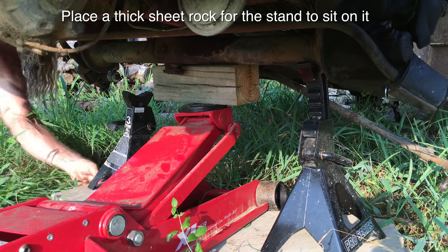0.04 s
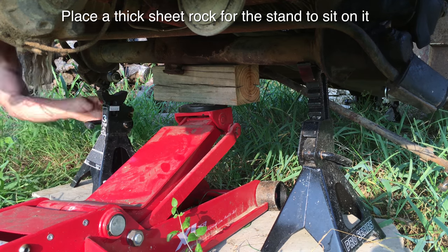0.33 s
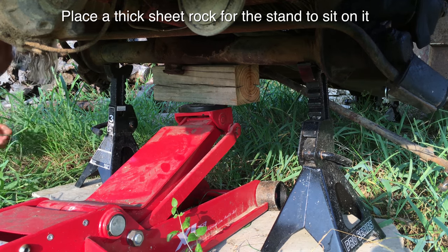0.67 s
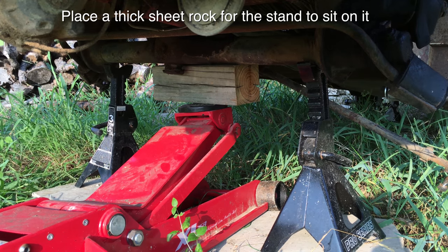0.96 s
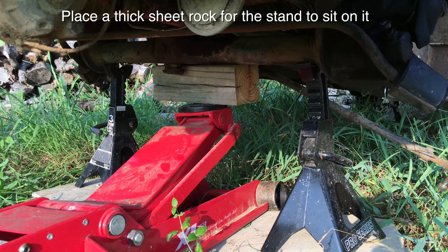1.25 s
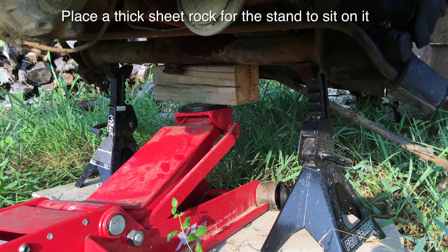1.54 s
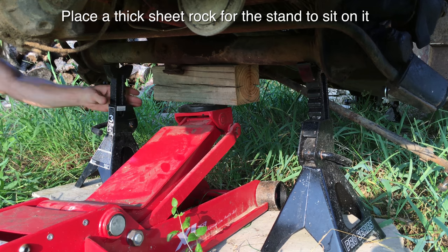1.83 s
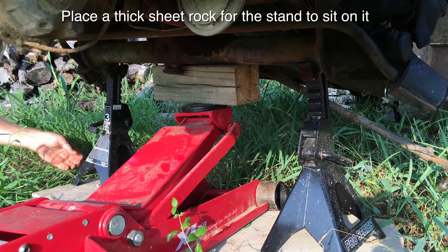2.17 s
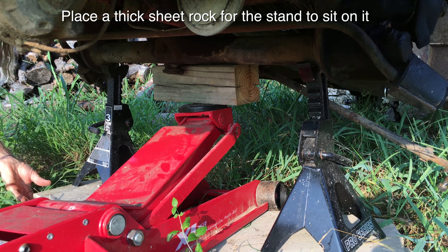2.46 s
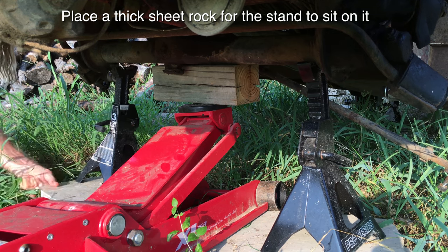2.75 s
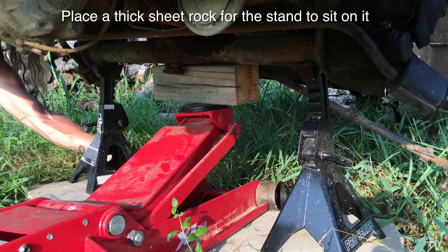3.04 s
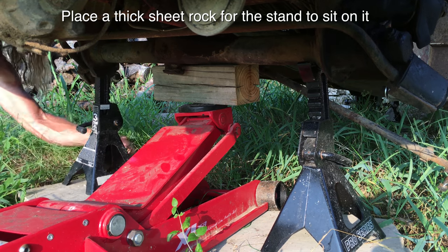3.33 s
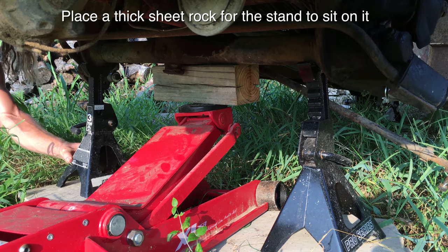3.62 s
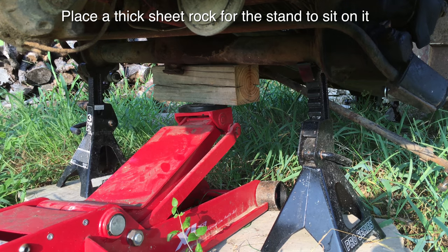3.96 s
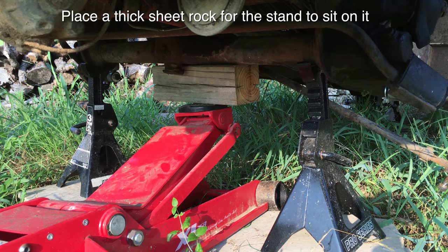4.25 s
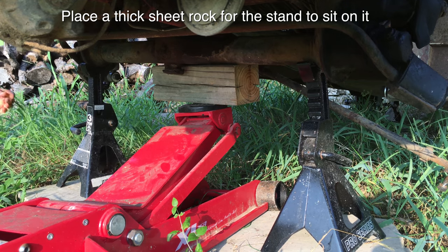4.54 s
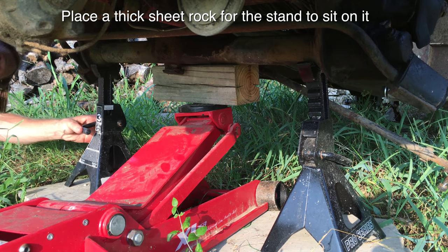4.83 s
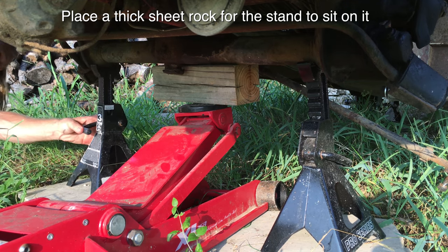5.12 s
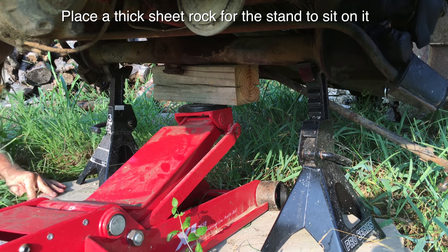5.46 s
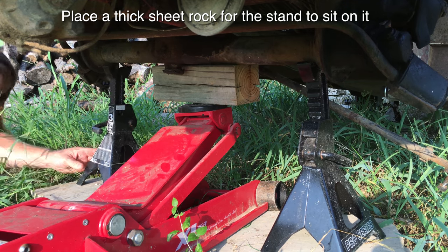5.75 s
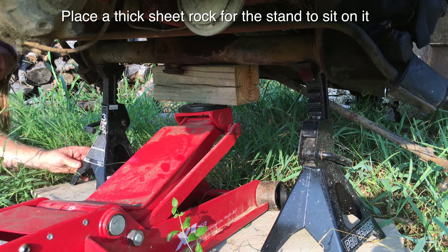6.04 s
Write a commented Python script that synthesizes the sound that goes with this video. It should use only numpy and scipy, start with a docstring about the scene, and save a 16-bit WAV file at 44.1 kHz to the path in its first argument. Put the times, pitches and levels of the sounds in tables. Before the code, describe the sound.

Close by, a steel jack stand clanks a few times and its toothed bar is pulled up with a short, ringing rattle. In the lull, small birds call faintly far off and a low drone swells. Then the legs are shuffled and knocked on a stone slab, with dull thuds in the soil, and a few light clanks finish. Grass rustles softly over a quiet outdoor rumble and thin hiss.

```python
"""A steel jack stand is set under a truck, outdoors in grass, over a low rumble and a thin high hiss.
First its toothed bar is pulled up with a rattle that rings the sheet-steel frame. In the lull after
it, small birds call far off and a low drone swells. Then the legs are shuffled and knocked on a stone
slab, which thuds on the soil, and a few light clanks end the move.
Grass rustles throughout as the stand is handled."""
import sys
import numpy as np
from scipy import signal
from scipy.fft import rfft, irfft, next_fast_len
from scipy.io import wavfile
from scipy.ndimage import map_coordinates

SR = 44100
rng = np.random.default_rng(int(sys.argv[2]) if len(sys.argv) > 2 else 0)


def file_out(sig):
    """Save sig as 16-bit WAV at sys.argv[1]."""
    # one column per channel
    cols = np.atleast_2d(sig).T
    # limit, then scale
    lim = np.clip(cols, -1, 1)
    pcm = np.round(lim * 32767).astype(np.int16)
    wavfile.write(sys.argv[1], SR, pcm)


N = 268480


def amp(db):
    """Decibels to gain."""
    return 10 ** (np.asarray(db) / 20)


def unit(x):
    """x at rms 1."""
    return x / np.sqrt(np.mean(x ** 2) + 1e-20)


def colour(points, hz):
    """Gain of an EQ curve: (Hz, dB) points joined on a log axis."""
    point_hz, db = np.transpose(points)
    return amp(np.interp(np.log(hz + 1), np.log(point_hz + 1), db))


def wobble(rate):
    """A smooth random curve, rate knots a second."""
    knots = rng.standard_normal(int(N * rate / SR) + 4)
    steps = np.linspace(0, len(knots) - 1, 10 * len(knots))
    return np.interp(np.arange(N) * rate / SR, steps, map_coordinates(knots, [steps]))


def filtered(x, gain):
    """x through a gain that is a function of frequency."""
    size = next_fast_len(N + SR // 2)
    return irfft(rfft(x, size) * gain(np.fft.rfftfreq(size, 1 / SR)), size)[:N]


def noise(eq, grain_db=0):
    """Coloured noise of rms 1; grain breaks it into tiny crackles."""
    source = rng.standard_normal(N) * amp(grain_db * wobble(600))
    return unit(filtered(source, lambda hz: colour(eq, hz)))


def swell_at(s, half, edge=2):
    """A smooth rise and fall around time s; a higher edge gives it a flatter top."""
    distance = np.abs((np.arange(N) / SR - s) / half)
    return np.exp(-.5 * np.minimum(distance, 10) ** edge)


def add(track, sound, s):
    """Mix a sound into the track, centred on time s."""
    start = round(s * SR) - len(sound) // 2
    sound = sound[max(-start, 0):max(N - start, 0)]
    track[max(start, 0):][:len(sound)] += sound


# The drone's fader ride. Each row: time in seconds, relative level in dB.
DRONE_RIDE = [(0.0, -79), (1.05, -66.5), (1.24, -63), (1.54, -63), (1.91, -67.5), (3.56, -68.5),
              (4.09, -69), (6.09, -74.5)]
# Tone of the low and the high bed. Each row: frequency in Hz, gain in dB.
RUMBLE_EQ = [(12, -50), (20, -23.5), (47, -2.5), (87, -4.5), (145, -7), (163, -8.5), (180, -12.5),
             (232, -15.5), (312, -17.5), (500, -38.5), (650, -66), (1100, -120)]
HISS_EQ = [(6000, -30.5), (8400, -24), (9000, -4), (9600, -2.5), (10150, 2.5), (10500, -7.5), (11000, -10),
           (12500, -22), (15600, -38)]


def air(drone_hz=146, width_hz=11):
    """The outdoor bed: rumble, a distant drone of narrow, wavering noise and a thin high hiss."""
    ride_db = np.interp(np.arange(N) / SR, *np.transpose(DRONE_RIDE))
    drone = filtered(rng.standard_normal(N), lambda hz: 1 / (1 + ((hz - drone_hz) / width_hz) ** 2))
    return amp(-64.5) * noise(RUMBLE_EQ) + amp(ride_db + 1) * unit(drone) + amp(-80) * noise(HISS_EQ)


# The birds' calls by name. Each entry: length in seconds, start pitch in Hz, end pitch in Hz.
BIRD_CALLS = {"slur": (.12, 4820, 3980), "whistle": (.095, 3980, 3890), "chip": (.024, 4600, 4390),
              "rise": (.032, 3170, 3380), "fall": (.05, 3310, 3060)}
# Bird cues. Each row: start in seconds, level in dB, name of the call.
BIRD_CUES = [(.348, -89, "chip"), (1.005, -75, "slur"), (1.258, -78, "fall"), (1.445, -74, "rise"),
             (1.452, -77, "chip"), (1.477, -68.5, "whistle"), (1.619, -77, "fall"), (1.786, -79, "chip"),
             (1.884, -76, "fall"), (2.264, -77, "rise"), (2.352, -75, "chip"), (3.845, -86, "slur")]


def birds(waver=0.012, echo_db=-7, echo_t60=0.25):
    """Far, gliding whistles that waver slightly, scattered by the surroundings."""
    song = np.zeros(N)
    unsteady = 1 + waver * wobble(250)
    for s, db, call in BIRD_CUES:
        length, start_hz, end_hz = BIRD_CALLS[call]
        progress = np.linspace(0, 1, int(length * SR))
        glide = start_hz + (end_hz - start_hz) * np.sin(np.pi * progress / 2) ** 2
        pitch = glide * unsteady[int(s * SR):][:len(glide)]
        envelope = np.sqrt(2 * np.abs(np.sin(np.pi * progress)))
        add(song, amp(db) * envelope * np.sin(2 * np.pi * np.cumsum(pitch) / SR), s + length / 2)
    t = np.arange(SR // 2) / SR
    tail = rng.standard_normal(len(t)) * 1000 ** (-t / echo_t60)
    return song + amp(echo_db) * signal.fftconvolve(song, tail / np.linalg.norm(tail))[:N]


# Long swishes of grass and short brushes through the blades.
# Each row: centre in seconds, half length in seconds, relative level in dB.
SWISH_CUES = [(.17, .1, -85), (.79, 0.039, -91), (1.052, 0.041, -81), (1.3, .13, -80), (1.605, 0.023, -82),
              (1.825, 0.016, -81), (2.46, 0.11, -83), (2.952, 0.099, -83.5), (3.18, 0.096, -87.5),
              (3.383, 0.059, -94), (3.804, 0.033, -89.5), (4.1, 0.084, -87), (4.293, 0.039, -79.5),
              (4.366, 0.033, -76), (5.386, 0.02, -80), (5.513, 0.032, -82.5)]
BRUSH_CUES = [(0.028, 0.0083, -64), (0.925, 0.022, -69), (1.137, 0.006, -71.5), (1.305, 0.0088, -72.5),
              (1.752, 0.014, -67), (2.075, 0.028, -66.5), (2.167, 0.0071, -67), (2.357, 0.0042, -67.5),
              (2.747, 0.0058, -58), (3.581, 0.03, -65.5), (3.754, .011, -72.5), (3.817, 0.013, -71.5),
              (4.035, 0.015, -61), (4.487, 0.0069, -63.5), (4.543, 0.0068, -62.5), (4.892, 0.015, -64),
              (4.956, .014, -67), (5.154, 0.019, -65), (5.248, 0.0062, -72), (5.424, 0.013, -68)]
# Tone of the dull shuffle, bright swish, crackling tips and brushed blades.
# Each row: frequency in Hz, gain in dB.
SHUFFLE_EQ = [(120, -22), (300, 2), (700, 2), (1600, -3.5), (3000, -9), (6000, -37)]
SWISH_EQ = [(1500, -22), (3000, -6), (6500, -3.5), (9000, -11.5), (12000, -12.5), (15500, -27.5)]
TIPS_EQ = [(5000, -12.5), (9000, -2.5), (12000, 3), (15500, -4.5)]
BLADES_EQ = [(300, 6.5), (1200, 9), (3000, 4.5), (7000, -3), (10000, -4), (15000, -11.5)]


def grass(knock_times, breeze_db=-77.5, scuff_db=-76.5, lull_db=-85):
    """Soft shuffling with each move over a stir of air, long swishes and brief brushes of the blades."""
    scuffs = sum(swell_at(s, half=0.094) for s in knock_times)
    sweeps = sum(amp(db) * swell_at(s, half, edge=3.7) for s, half, db in SWISH_CUES)
    strokes = sum(amp(db) * swell_at(s, half) for s, half, db in BRUSH_CUES)
    flutter = amp(0.51 * wobble(9.2) + 1.4 * wobble(100))  # blades catch and let go
    movement = np.sqrt(amp(breeze_db) ** 2 + (amp(scuff_db) * scuffs) ** 2 + (amp(1) * sweeps) ** 2)
    shuffle = movement * amp(0.98 * wobble(5.9)) * noise(SHUFFLE_EQ, grain_db=2)
    swish = (amp(lull_db) + sweeps) * flutter * noise(SWISH_EQ, grain_db=1.5)
    tips = amp(4) * sweeps * flutter * noise(TIPS_EQ, grain_db=1.5)
    return shuffle + swish + tips + strokes * noise(BLADES_EQ)


def struck(modes, hz, vary_db):
    """Frequency response of a body hit at a random spot: the plain blow plus its modes."""
    mode_hz, t60, mode_db = np.transpose(modes)[:, :, None]
    width = np.log(1000) / np.pi / t60
    strength = amp(mode_db + vary_db * rng.standard_normal(mode_db.shape))
    damping = 1j * hz * width
    return 1 + np.sum(strength * damping / (mode_hz ** 2 - hz ** 2 + damping), axis=0)


def hollow(eq, spot_hz, lift_db, octaves):
    """A blow's gain as a function of frequency: its EQ with a hump at the note of the spot hit."""
    def gain(hz):
        distance = np.log2((hz + 1) / spot_hz) / octaves
        return colour(eq, hz) * amp(lift_db * np.exp(-.5 * distance ** 2))
    return gain


def contact(half, db, modes, blow, grain_db, grip, held_db, vary_db, size=8192):
    """A smeared, grainy hit that swells, fades and briefly rings a body."""
    t = (np.arange(size) - size // 2) / SR
    hz = np.fft.rfftfreq(size, 1 / SR)
    swell = np.exp(-.5 * np.abs(t / half) ** 2.25)
    spectrum = rfft(swell * rng.standard_normal(size) * amp(grain_db * rng.standard_normal(size)))
    burst = irfft(spectrum / (np.abs(spectrum) + 1e-9))  # equally strong at all frequencies
    force = burst * np.sqrt(swell)
    ring = irfft(rfft(force) * struck(modes, hz, vary_db) * blow(hz))
    # the parts press together and choke the ring to a faint remainder; grip counts in half lengths
    choke = amp(held_db) + np.exp(-.5 * (np.maximum(t, 0) / (grip * half)) ** 2)
    ring = ring * choke * np.hanning(size)
    return amp(db) * ring * np.sqrt(np.sum(swell ** 2) / np.sum(ring ** 2))


# Resonances of slab and soil. Each row: pitch in Hz, t60 in seconds, level over the plain blow in dB.
SLAB_MODES = [(246, 0.054, -1), (378, .1, 7.5), (544, 0.023, 6.5), (576, 0.071, 15.5)]
SOIL_MODES = [(62, .12, -9), (94.4, 0.24, 2.5)]
# Tone of the plain blow on each. Each row: frequency in Hz, gain in dB.
SLAB_EQ = [(60, -9), (150, 6), (280, 4), (600, -12), (900, -1.5), (1400, -19), (3000, -42), (9000, -32.5),
           (16000, -55.5)]
SOIL_EQ = [(15, -25.5), (35, -3), (55, -4.5), (110, -6), (170, -12.5), (300, -21), (1000, -58)]
# Weight coming down on the slab. Each row: centre in seconds, half length in seconds,
# knock level in dB, slab note in Hz, thud level in dB, soil note in Hz.
KNOCK_CUES = [(0.545, 0.0089, -30.5, 580, -36.5, 106.8), (0.561, 0.017, -38.5, 430, -47, 100),
              (0.618, .018, -58, 250, -51, 80), (0.993, 0.023, -60, 326, -85, 110),
              (1.679, 0.019, -52.5, 345, -68, 90), (2.741, .013, -49.5, 442, -44.5, 107),
              (3.183, 0.014, -48, 585, -48, 58.6), (3.294, 0.017, -62, 323, -43, 70),
              (3.353, 0.02, -56.5, 427, -43.5, 69), (3.629, 0.0094, -44.5, 440, -49, 100),
              (3.987, 0.017, -57.5, 315, -57, 88), (4.035, 0.044, -64.5, 284, -55.5, 72.4),
              (4.501, 0.014, -54, 312, -39.5, 52.4), (4.606, 0.026, -62.5, 285, -55, 65),
              (4.67, 0.0141, -64, 436, -55, 69)]


def ground():
    """The feet knock on the slab, which then presses into the soil, each spot with its own note."""
    track = np.zeros(N)
    for s, half, knock_db, slab_hz, thud_db, soil_hz in KNOCK_CUES:
        blow = hollow(SLAB_EQ, slab_hz, lift_db=9.5, octaves=0.18)
        knock = contact(half, knock_db, SLAB_MODES, blow, grain_db=4, grip=1.3, held_db=-15, vary_db=4)
        add(track, knock, s)
        blow = hollow(SOIL_EQ, soil_hz, lift_db=12, octaves=0.59)
        thud = contact(1.5 * half, thud_db, SOIL_MODES, blow, grain_db=9, grip=3, held_db=-16, vary_db=5)
        add(track, thud, s + 0.7 * half)  # the soil gives way later and for longer
    return track


# Pure partials of the toothed bar. Each row: pitch in Hz, relative level in dB.
BAR_PARTIALS = [(413, -10), (1022, -6), (1100, -5), (1884, -6), (1949, -5), (2063, -10), (2194, 3),
                (2657, -5.5), (2697, -6.5), (2908, -6), (3127, -14.5), (3434, -3.5), (3981, -10),
                (4483, -16), (4510, -13), (4969, -18), (5782, -22), (6158, -23), (6853, -25), (9351, -28.5)]


def bar_ring(clanks, t60=0.021, vary_db=6, waver_rad=0.54):
    """The bar's partials ring on through a rattle and stop soon after it, damped by hand and socket."""
    t = np.arange(N) / SR
    drive, tones = np.zeros((2, N))
    for s, half, _, bar_db, _ in clanks:
        add(drive, amp(bar_db) * signal.windows.gaussian(SR // 5, half * SR), s)
    decay = 1000 ** (-1 / (t60 * SR))
    envelope = signal.lfilter([1 - decay], [1, -decay], drive)
    for hz, db in BAR_PARTIALS:
        shimmer = amp(db + vary_db * wobble(10))
        tones += shimmer * np.sin(2 * np.pi * (hz * t + rng.random()) + waver_rad * wobble(40))
    return envelope * unit(tones)


# Resonances of the sheet-steel frame and of the bar rattling in its socket.
# Each row: pitch in Hz, t60 in seconds, level over the plain blow in dB.
FRAME_MODES = [(440, 0.047, 10), (631, 0.051, 10.5), (686, 0.063, 8.5), (813, 0.2, 7), (963, .08, 3.5),
               (1044.5, 0.1, 16.5), (1199, .07, -1.5), (1368, 0.055, 5), (1475, 0.095, 10), (1620, 0.15, 8),
               (1958, 0.033, 9), (2390, 0.084, 9.5), (2413, 0.044, 9.5), (2530, 0.03, 2), (2596, 0.02, 1.5),
               (3330, .08, 7.5), (3860, 0.035, 10), (3990, .09, 2.5), (5520, 0.053, 5.5)]
BAR_MODES = [(660, 0.086, 4), (780, 0.1, 10.5), (1290, 0.069, 4.5), (1324, 0.029, 0.5), (1880, 0.18, 6.5),
             (2236, .08, 12), (2410, 0.078, 3), (2498, 0.07, 4), (2810, .06, 11.5), (2910, 0.13, 6),
             (3490, 0.084, 5.5), (3927, 0.038, 14), (5060, 0.15, 9.5), (5710, 0.11, 7.5), (6412, .1, 9),
             (7190, 0.19, 1), (8560, .1, 4.5)]
# Tone of the plain blow on each. Each row: frequency in Hz, gain in dB.
FRAME_EQ = [(100, -22.5), (250, -2.5), (450, -0.5), (700, 3), (1300, 3), (1900, -1.5), (2700, -7),
            (3500, -12), (5000, -20.5), (8000, -22), (11000, -31), (16000, -31.5)]
BAR_EQ = [(100, -28.5), (300, -8.5), (600, -13.5), (1400, 2.5), (2600, -4.5), (3600, -4), (5000, -8.5),
          (7000, -12), (9300, -15), (11000, -23.5), (13000, -32), (16000, -38)]
# Steel hits. Each row: centre in seconds, half length in seconds, frame level in dB,
# relative bar level in dB, note of the spot hit in Hz.
CLANK_CUES = [(0.067, 0.028, -59.5, -69, 485), (0.113, 0.0049, -55, -73, 550),
              (.136, 0.0085, -49.5, -56, 2400), (.172, 0.011, -36.5, -44.5, 2230),
              (.2, 0.0037, -55, -57.5, 2400), (.237, 0.011, -43, -50, 1050),
              (0.268, 0.0099, -40.5, -45, 1060), (.457, .006, -61.5, -86, 1000),
              (.483, 0.01, -47, -62, 2280), (.502, 0.0081, -48, -31.5, 1050),
              (.522, 0.01, -38.5, -29.5, 1000), (.542, .0073, -28.5, -29, 1300),
              (.556, 0.0016, -28, -36, 1000), (.572, .012, -40, -34.5, 993),
              (.644, 0.0086, -36.5, -30.5, 2250), (.836, 0.0073, -64, -75, 1860),
              (1.812, 0.025, -64, -82.5, 894), (1.983, 0.0088, -44, -52.5, 1100),
              (2.669, 0.0062, -56, -62, 900), (2.731, .0083, -48, -85, 660),
              (2.824, 0.0063, -54.5, -64, 900), (2.868, 0.0077, -49, -78, 820),
              (2.925, 0.0095, -47, -61, 990), (2.971, 0.0099, -58, -69, 564),
              (2.995, .0048, -47.5, -74, 980), (3.176, 0.0073, -51, -61.5, 704),
              (3.29, 0.0056, -57, -66.5, 2050), (3.363, 0.0074, -45.5, -69, 800),
              (3.409, 0.0084, -43, -56, 1050), (3.566, 0.0085, -52, -86.5, 1330),
              (3.617, 0.0048, -46.5, -55, 1100), (3.976, .011, -62, -62.5, 1650),
              (4.645, 0.011, -58, -62, 1620), (4.698, .011, -64, -72, 1300),
              (5.508, 0.029, -60.5, -86, 790), (5.558, 0.0043, -57, -84, 1940),
              (5.587, 0.0084, -45, -57.5, 1000), (5.611, 0.024, -61, -79, 1000),
              (5.704, 0.0068, -58, -74, 1000)]


def stand():
    """Every clank rings the frame, coloured by the spot hit, and the loose toothed bar inside it."""
    track = amp(-2) * bar_ring(CLANK_CUES)
    for s, half, frame_db, bar_db, spot_hz in CLANK_CUES:
        blow = hollow(FRAME_EQ, spot_hz, lift_db=6, octaves=0.35)
        clank = contact(half, frame_db, FRAME_MODES, blow,
                        grain_db=7, grip=1.9, held_db=-26.5, vary_db=5.5)
        rattle = contact(half, bar_db - 1.5, BAR_MODES, lambda hz: colour(BAR_EQ, hz),
                         grain_db=8, grip=1.1, held_db=-33, vary_db=8.5)
        add(track, clank + rattle, s)
    return track


def scene():
    """A mono mix in the open air: stand, ground and grass up close, birds and bed behind."""
    knock_times = [s for s, *_ in KNOCK_CUES]
    return (stand() + ground() + grass(knock_times) + birds() + air())[None]


def record(dry, top_hz=15720):
    """A brick-wall low-pass takes off the very top of the treble."""
    return filtered(dry[0], lambda hz: hz < top_hz)[None]


dry = scene()
out = record(dry)
file_out(out)
```